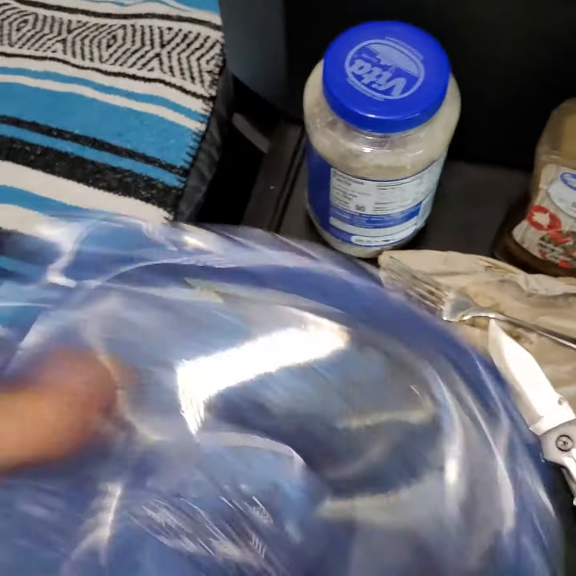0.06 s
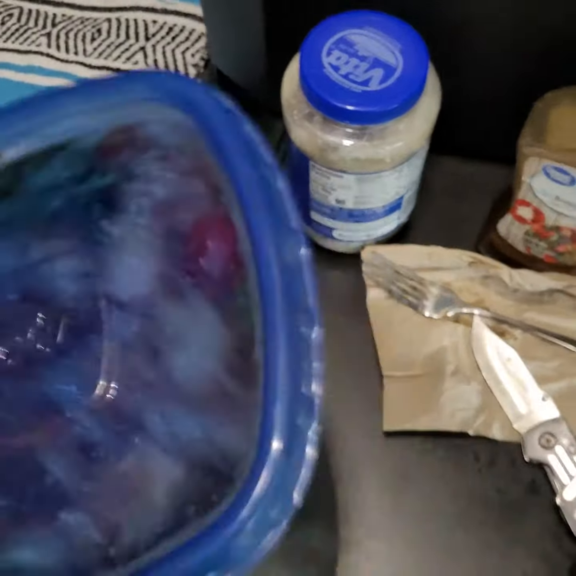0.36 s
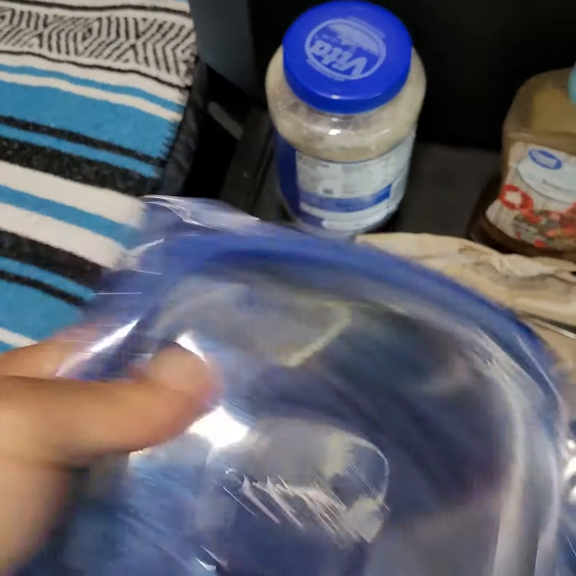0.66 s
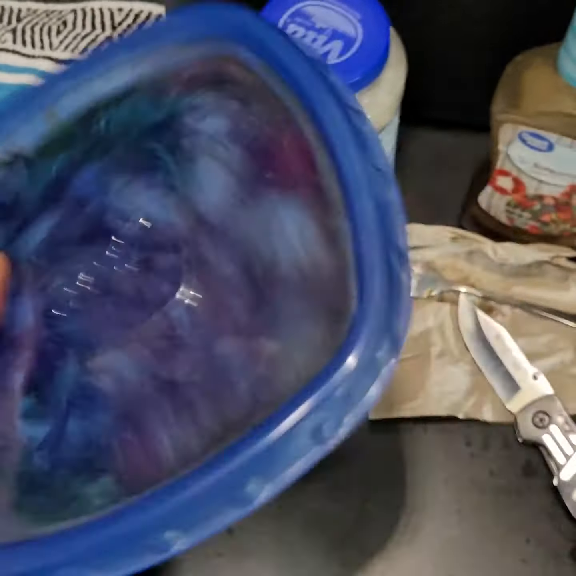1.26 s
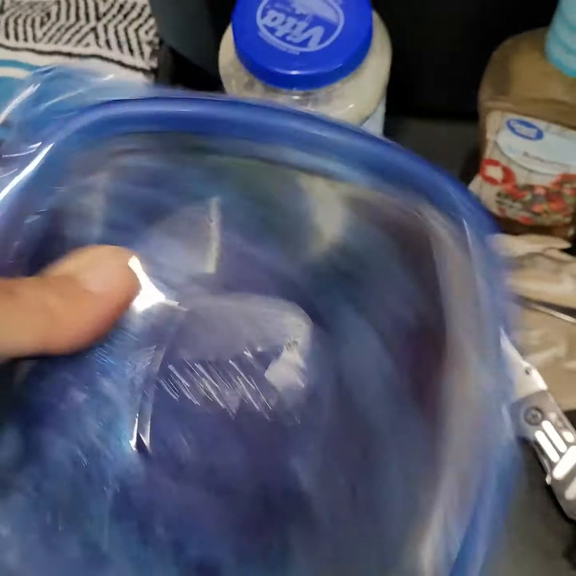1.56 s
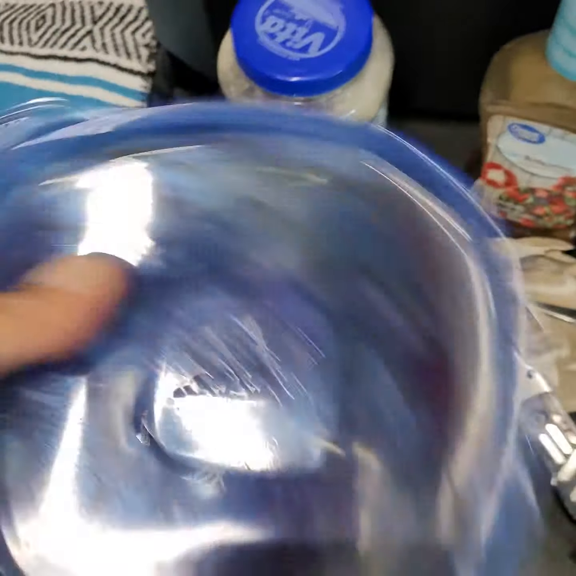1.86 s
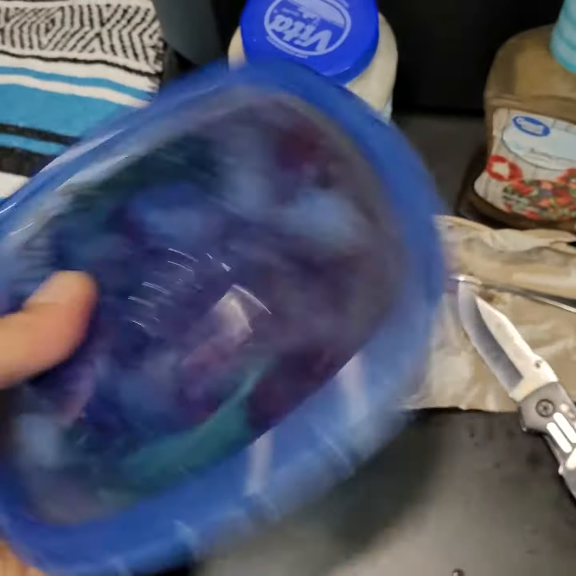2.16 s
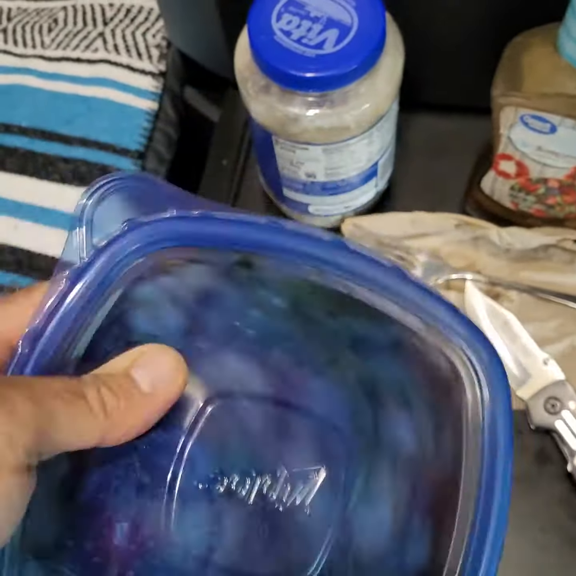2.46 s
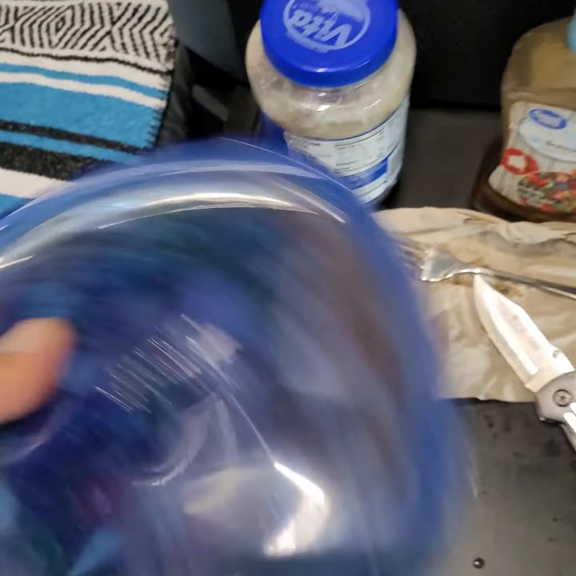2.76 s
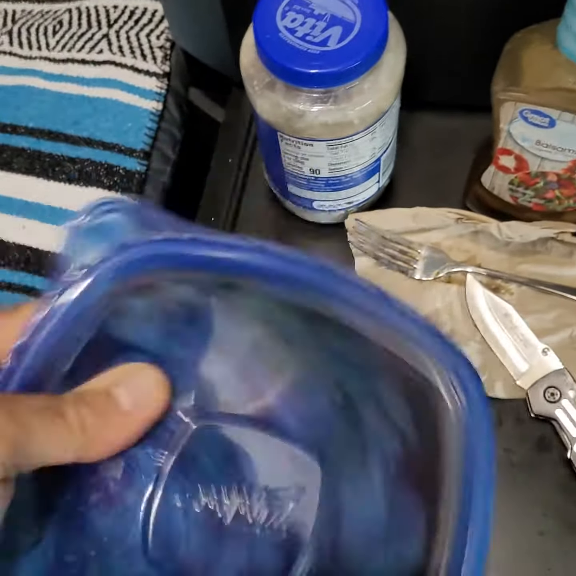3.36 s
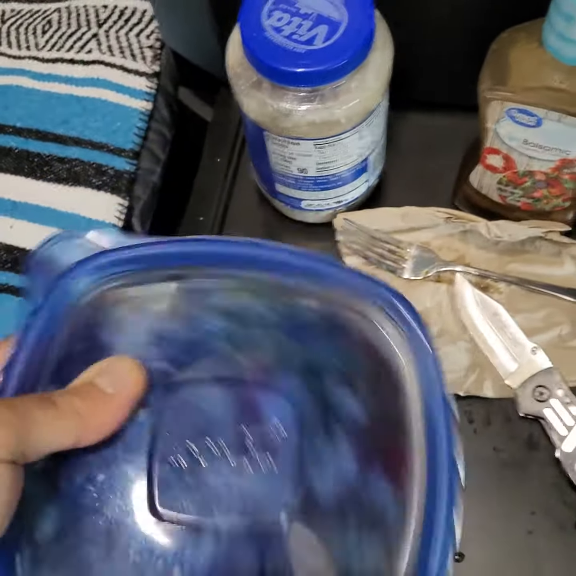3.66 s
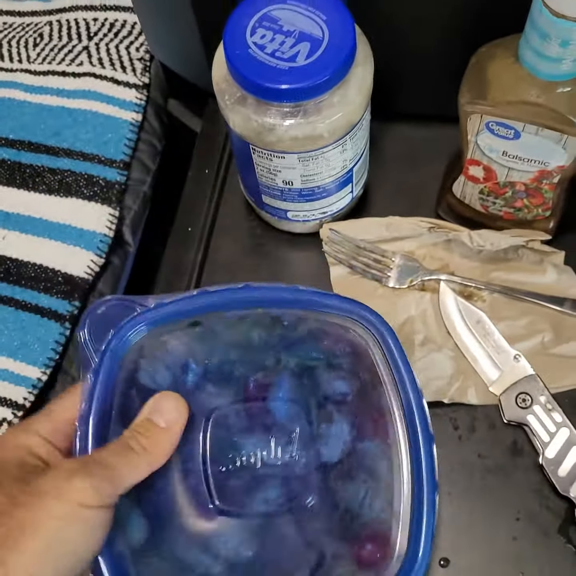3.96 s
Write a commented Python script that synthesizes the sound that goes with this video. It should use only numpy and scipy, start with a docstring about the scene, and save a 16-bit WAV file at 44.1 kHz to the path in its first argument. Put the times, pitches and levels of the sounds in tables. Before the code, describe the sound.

Close up in a softly rumbling vehicle cab, juicy fruit pieces hit the walls of a shaken plastic container in a quick, even rhythm, thudding, knocking and crackling wetly. The plastic snaps occasionally, and the shaking stops near the end.

```python
"""Inside a rumbling vehicle cab, close to the microphone, soft wet fruit is shaken in a lidded plastic tub.
From the start, about nine times a second, the hand turns and the heap lands on the wall with dull thuds,
a harder patter and a wet crackle. As the shaking goes on, heavy pieces knock, juicy ones smack and the
plastic snaps now and then. Near the end the shaking stops and a thin squeal lingers over the rumble."""
import sys
import numpy as np
from scipy import signal
from scipy.fft import rfft, irfft, next_fast_len
from scipy.io import wavfile

SR = 44100
rng = np.random.default_rng(int(sys.argv[2]) if len(sys.argv) > 2 else 0)


def transcribe(signal):
    """Save signal, clipped to [-1, 1], as a 16-bit WAV file at the path in sys.argv[1]."""
    frames = np.atleast_2d(signal).T
    limited = np.clip(frames, -1, 1)
    pcm = np.round(limited * 32767).astype(np.int16)
    wavfile.write(sys.argv[1], SR, pcm)


N = 176400
STROKE_SAMPLES = SR // 4

# The heap landing on the tub wall, close to the microphone. Each row: middle in seconds, spread in
# seconds, then the levels of thuds, patter and crackle in dB, the last two before their trims.
LANDINGS = [(0.035, 0.02, -33.5, -42.5, -50), (0.159, 0.02, -40.5, -43, -53),
            (0.271, 0.034, -40.5, -44.0, -54.5), (0.389, 0.023, -38, -38.5, -53.5),
            (0.504, 0.027, -35, -41.5, -52.5), (0.65, 0.02, -39.5, -36, -48.5),
            (0.75, 0.025, -33.5, -45.5, -54), (0.883, 0.019, -31.5, -37, -50),
            (0.974, 0.016, -33.5, -34.5, -47.5), (1.109, 0.019, -33, -34.5, -47),
            (1.204, 0.025, -30, -42.5, -50), (1.325, 0.024, -32.5, -35, -50),
            (1.419, 0.027, -37.5, -35, -48.5), (1.534, 0.023, -37, -33, -48),
            (1.64, 0.025, -39.5, -31.5, -47), (1.754, 0.027, -34.5, -35.5, -52.5),
            (1.858, 0.021, -37, -33.5, -47.5), (1.973, 0.023, -37, -33, -49),
            (2.076, 0.019, -31.5, -34, -45), (2.189, 0.024, -34, -36, -46.5), (2.295, 0.022, -37, -35, -49),
            (2.416, 0.033, -37.5, -40, -52.5), (2.515, 0.018, -36, -35, -50.5),
            (2.632, 0.024, -35, -36, -49), (2.737, 0.02, -32.5, -41.5, -49.5),
            (2.853, 0.025, -36, -36.5, -52), (2.962, 0.025, -36, -36.5, -49.5),
            (3.082, 0.024, -34.5, -35, -54), (3.184, 0.015, -33.5, -38.5, -51),
            (3.308, 0.029, -38.5, -36, -53), (3.415, 0.021, -32.5, -41.5, -53),
            (3.537, 0.024, -41, -36, -53), (3.634, 0.022, -35, -43, -56)]
PATTER_TRIM_DB, CRACKLE_TRIM_DB = -1.5, 2
THUD_LAG_S = 0.00408   # the bulk arrives after the first pieces

def heap():
    """At each turn of the hand the fruit hits the wall: soft thuds, harder patter and wet crackle."""
    out = np.zeros((2, N))
    for s, spread, thud_db, patter_db, crackle_db in LANDINGS:
        thuds = tub(contacts(spread * 1.275, per_s=260, size_db=7.0, shape=2.66))
        thuds = cut(thuds, 487, "low")
        patter = tub(contacts(spread, per_s=270, size_db=7.5, shape=2.7))
        patter = cut(cut(patter, 2030, "low"), 490, "high")
        juice = crackle(contacts(spread, per_s=480, size_db=2.0, shape=1.69))
        start = s - STROKE_SAMPLES / SR / 2
        add(out, start + THUD_LAG_S, at_level(thuds, thud_db))
        add(out, start, at_level(patter, patter_db + PATTER_TRIM_DB))
        add(out, start, at_level(juice, crackle_db + CRACKLE_TRIM_DB))
    return out


def contacts(spread, per_s, size_db, shape, settle_s=0.034, flight_db=-16):
    """Random hits swell and fade around one landing; they are weaker while the heap is in flight."""
    t = (np.arange(STROKE_SAMPLES) - STROKE_SAMPLES / 2) / SR
    bulk = np.exp(-np.abs(t / spread) ** shape)
    stragglers = from_db(-15.5) * np.exp(-np.abs(t) / settle_s)
    in_flight = t < -1.8 * spread
    force = (bulk + stragglers) * from_db(flight_db * in_flight)
    return force * random_clicks(len(t), per_s, size_db)


# The modes of the plastic tub. Each row: pitch in Hz, time to fall 60 dB in seconds, left gain in dB,
# right gain in dB.
TUB_MODES = [(162, 0.033, -2.5, -4), (234.4, 0.055, -1, -1), (304, 0.036, 3.5, 2), (417, 0.031, -13.5, -1),
             (632.5, 0.018, 5, -4), (730, 0.065, -9, -12), (1046, 0.018, -0.5, -5.5),
             (1209, 0.046, -9, -8.5), (1700, 0.015, -9, -5.5), (2050, 0.0097, -12.5, -3.5),
             (2685, 0.015, -4, -8)]

def tub(clicks, scatter_hz=870, load_wander=0.077):
    """Every contact rings all the modes; the load on the wall retunes them from landing to landing."""
    out, hits = 0, np.flatnonzero(clicks)
    for hz, t60, left_db, right_db in TUB_MODES:
        # above scatter_hz, each place on the wall drives the mode differently
        scatter = (hz / scatter_hz) ** 2
        place = rng.standard_normal((2, 256))[:, np.arange(len(hits)) % 256]
        drive = np.zeros((2, len(clicks)))
        drive[:, hits] = clicks[hits] * (1 + scatter * place) / np.hypot(1, scatter)
        loaded_hz = hz * np.exp(load_wander * rng.standard_normal())
        decay = from_db(-60 / (t60 * SR))
        feedback = [1, -2 * decay * np.cos(2 * np.pi * loaded_hz / SR), decay ** 2]
        ring = signal.lfilter([1, 0, -1], feedback, drive + 1e-18)
        out = out + (1 - decay ** 2) * from_db([[left_db], [right_db]]) * ring
    return delay_left(out)


# The tone of the juice from close up. Each row: frequency in Hz, left gain in dB, right gain in dB.
JUICE_SPECTRUM = [(506, -19, -32), (1470, 11, 20), (2600, 9.5, 3), (3350, 4.5, 5.5), (4820, 6, 0),
                  (6810, -5, -2.5), (7470, 0, -3), (12400, -6, -0.5), (16900, -3, -3.5)]
JUICE_T60_S = 0.019

def wet(x):
    """Give noise the colour of juice films breaking on plastic."""
    hz, *sides = np.transpose(JUICE_SPECTRUM)
    return np.array([colour(side, hz, db) for side, db in zip(x, sides)])


def crackle(clicks):
    """Every click opens its own tiny puff of wet noise, which dies at once."""
    energy_decay = from_db(-120 / (JUICE_T60_S * SR))
    energy = signal.lfilter([1], [1, -energy_decay], clicks ** 2 + 1e-18)
    return wet(np.sqrt(energy) * rng.standard_normal((2, len(clicks))))


# Single heavy pieces hitting the wall. Each row: start in seconds, level in dB, pitch of the struck
# patch in Hz.
HEAVY_HITS = [(0.2897, -21.5, 343), (0.395, -22, 315), (0.521, -23.5, 303), (0.6515, -18.5, 335),
              (.7293, -23.5, 890), (0.7398, -21.5, 1060), (0.7468, -19, 295), (0.7736, -19, 284),
              (.887, -23.5, 288), (1.099, -21.5, 245), (1.1123, -25, 640), (1.1231, -26.5, 560),
              (1.2043, -21, 710), (1.2273, -25, 306), (1.3127, -26.5, 700), (1.3271, -21, 333),
              (1.4022, -21.5, 1270), (1.4189, -18.5, 273), (1.4322, -17, 289), (1.5357, -21, 670),
              (1.5416, -20.5, 312), (1.63, -20.5, 317), (1.638, -17, 298), (1.651, -17.5, 734),
              (1.6529, -17, 261), (1.7544, -21.5, 710), (1.849, -17, 1170), (1.8525, -21.5, 305),
              (1.8606, -17, 1090), (1.9742, -22, 730), (2.071, -21, 1180), (2.0836, -18, 252),
              (2.0844, -19, 1240), (2.1567, -32, 970), (2.2939, -14, 1144), (2.2974, -24.5, 420),
              (2.4072, -22.5, 684), (2.4283, -23.5, 730), (2.4913, -29.5, 730), (2.5161, -17.5, 307),
              (2.516, -16, 1080), (2.7377, -23, 1150), (2.9601, -17.5, 332), (2.9651, -19, 680),
              (3.1553, -28.5, 1040), (3.1772, -21.5, 310), (3.1783, -19.5, 1040), (3.1882, -19.5, 260),
              (3.4659, -23, 325), (3.4663, -24, 670), (3.5472, -20.5, 700)]

def knocks(ring_cycles=9.35, pan_db_per_octave=2.5, tub_db=-7.5, spray_db=-15):
    """A piece and its patch of wall ring briefly; the tub answers, and firmer hits spray more juice."""
    out, t = np.zeros((2, N)), np.arange(STROKE_SAMPLES // 2) / SR
    for s, db, hz in HEAVY_HITS:
        cycles, firmness = hz * t, hz / 324   # knocks above 324 Hz lean to the left
        envelope = (1 - np.exp(-2 * cycles)) * from_db(-60 * cycles / ring_cycles)
        ring = peak_one(np.sin(2 * np.pi * cycles) * envelope)
        pan = from_db(pan_db_per_octave * np.log2(firmness) * np.array([[.5], [-.5]]))
        body = peak_one(cut(tub(signal.unit_impulse(len(t))), 2 * hz, "low"))
        spray = np.sqrt(firmness) * peak_one(wet(burst(JUICE_T60_S)))
        add(out, s, from_db(db) * (delay_left(pan * ring) + from_db(tub_db) * body))
        add(out, s, from_db(db + spray_db) * spray)
    return out


# The plastic snapping. Each row: start in seconds, peak level in dB, upper band edge in Hz.
PLASTIC_SNAPS = [(0.634, -20, 2980), (.968, -26, 2490), (1.8483, -23.5, 5040), (1.9347, -15, 1850),
                 (2.428, -20.5, 3500), (2.452, -29, 6100)]

def snaps():
    """The flexing plastic gives short, dry cracks."""
    out = np.zeros((2, N))
    for s, db, top_hz in PLASTIC_SNAPS:
        snap = cut(cut(burst(t60=0.0097), 930, "high"), top_hz, "low")
        add(out, s, from_db(db) * peak_one(snap))
    return out


# Juicy pieces meeting the wall. Each row: start in seconds, peak level in dB.
JUICY_SMACKS = [(0.7407, -21), (1.1931, -20), (1.4028, -15.5), (1.627, -15.5), (2.0835, -22),
                (2.7359, -24.5), (3.5472, -26.5), (3.837, -47), (3.993, -45)]

def smacks():
    """A juicy piece slaps the plastic with a bright, wet burst."""
    out = np.zeros((2, N))
    for s, db in JUICY_SMACKS:
        smack = cut(wet(burst(t60=0.018)), 3850, "high", order=1)
        add(out, s, from_db(db) * peak_one(smack))
    return out


# The fruit shifting between landings. Each row: time in seconds, level in dB.
SLIDE_LEVELS = [(1.7, -61), (2.4, -60), (3.58, -57), (3.8, -72)]

def sliding():
    """Wet pieces tick as they slide over one another, fading as the shaking stops."""
    ticks = crackle(random_clicks(N, per_s=600, size_db=3.5))
    level_db = np.interp(np.arange(N) / SR, *np.transpose(SLIDE_LEVELS))
    return from_db(level_db) * ticks / rms(ticks)


# A thin squeal, perhaps air leaking past the lid. Each row: time in seconds, pitch in Hz, level in dB.
SQUEAL_PATH = [(3.635, 11400, -80), (3.695, 11500, -63.5), (3.72, 11400, -73.5), (3.772, 11570, -64),
               (3.805, 11000, -91), (3.97, 10300, -92)]

def squeal(waver_hz=60, lower_ratio=0.91, lower_db=-81):
    """Two faint whistles waver and sink; the lower holds its level while the upper fades."""
    s, hz, db = np.transpose(SQUEAL_PATH)
    t = np.arange(N) / SR
    waver = cut(rng.standard_normal(N), 300, "low")
    pitch = np.interp(t, s, hz) + waver_hz * waver / rms(waver)
    phase = 2 * np.pi * np.cumsum(pitch) / SR
    upper = np.interp(t, s, from_db(db)) * np.sin(phase)
    lower = from_db(lower_db) * np.sin(lower_ratio * phase)
    return np.sqrt(2) * (upper + lower) * (t > s[0]) * (t < s[-1])


def cab_reflections(x, level_db=-21):
    """The small padded cab sends a short, dull echo back to the microphone."""
    tail = cut(burst(t60=0.094), 6740, "low", order=1)
    tail[:, :SR // 300] = 0   # travel time to the nearest surface and back
    tail /= rms(tail) * np.sqrt(STROKE_SAMPLES)
    return from_db(level_db) * signal.fftconvolve(x, tail, axes=1)[:, :N]


# The cab's rumble, all around the microphone. Each row: frequency in Hz, relative level in dB.
CAB_SPECTRUM = [(33, -2), (50, -6), (78, 1.5), (100, -5.5), (260, -1), (380, -16), (600, -22),
                (1500, -43.5), (4000, -58.5), (9000, -52.5)]

def cab_rumble(level_db=-41.5, apart_hz=910):
    """Steady cab noise, alike on both sides in the bass and unrelated in the treble."""
    hz, db = np.transpose(CAB_SPECTRUM)
    mid, side = (colour(rng.standard_normal(N + SR), hz, db)[SR:] for _ in range(2))
    side = from_db(-12.5) * side + cut(side, apart_hz, "high")
    return from_db(level_db) * (mid + side * np.array([[1], [-1]])) / rms(mid)


def delay_left(x, lag_s=0.00019):
    """Sound from the tub reaches the left side of the microphone a little later."""
    samples = np.arange(x.shape[1])
    return np.array([np.interp(samples - lag_s * SR, samples, x[0], left=0), x[1]])


def random_clicks(length, per_s, size_db):
    """Impulses at random times, their sizes scattered by size_db."""
    sizes = from_db(size_db * np.clip(rng.standard_normal(length), -2, 2))
    return sizes * (rng.random(length) < per_s / SR)


def burst(t60):
    """Noise that falls 60 dB in t60 seconds, different on each side."""
    t = np.arange(STROKE_SAMPLES) / SR
    return rng.standard_normal((2, len(t))) * from_db(-60 * t / t60)


def cut(x, hz, kind, order=2):
    """Butterworth low- or high-pass."""
    return signal.sosfilt(signal.butter(order, hz, kind, fs=SR, output="sos"), x + 1e-18)


def colour(x, hz, db):
    """Causal (minimum-phase) filter through the given points."""
    size = 2 * next_fast_len(len(x))
    log_hz = np.log(np.fft.rfftfreq(size, 1 / SR) + 1)
    gain = from_db(np.interp(log_hz, np.log(hz), db))
    cepstrum = irfft(np.log(gain))
    cepstrum[1:size // 2] *= 2
    cepstrum[size // 2 + 1:] = 0
    return irfft(rfft(x, size) * np.exp(rfft(cepstrum)))[:len(x)]


def add(out, s, sound):
    """Mix a stereo sound in at s seconds."""
    start = int(s * SR)
    a, b = max(start, 0), min(start + sound.shape[1], N)
    out[:, a:b] += sound[:, a - start:b - start]


def at_level(x, db):
    """Set the level of a stroke, as if its energy fell within a tenth of a second."""
    return from_db(db) * x / (rms(x) * np.sqrt(10 * STROKE_SAMPLES / SR))


def peak_one(x):
    """Scale to a peak of 1."""
    return x / np.abs(x).max()


def from_db(db):
    """Decibels to gain."""
    return 10 ** (np.asarray(db) / 20)


def rms(x):
    """Root mean square."""
    return np.sqrt(np.mean(x ** 2) + 1e-20)


def scene():
    """The shaken tub up close, with the cab behind it."""
    shaking = heap() + sliding() + knocks() + snaps() + smacks()
    return shaking + cab_reflections(shaking) + squeal() + cab_rumble()


def record(dry, cutoff_hz=15900):
    """The highest treble is cut steeply."""
    return signal.sosfilt(signal.ellip(10, .2, 80, cutoff_hz, fs=SR, output="sos"), dry)


dry = scene()
out = record(dry)
transcribe(out)
```